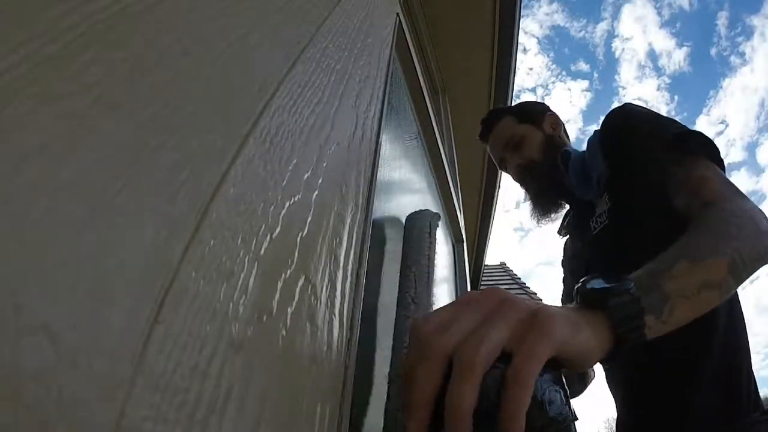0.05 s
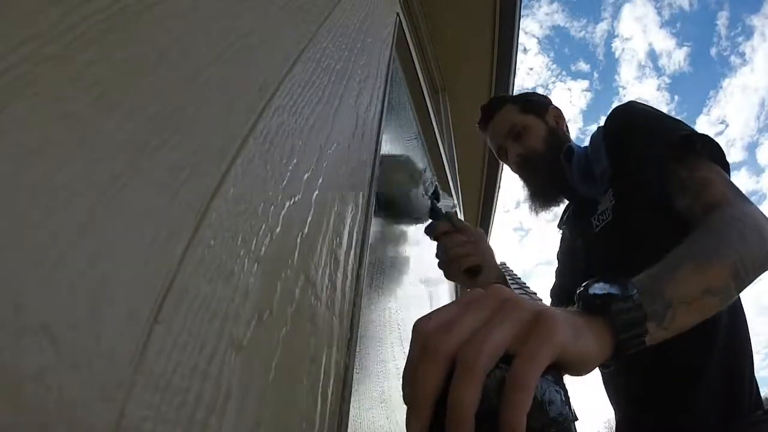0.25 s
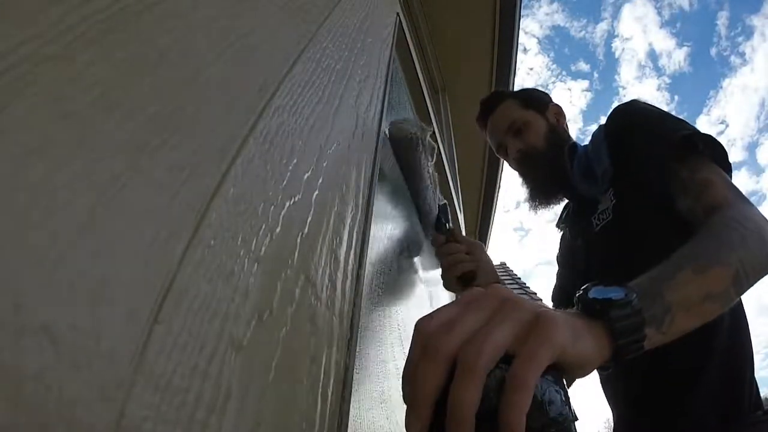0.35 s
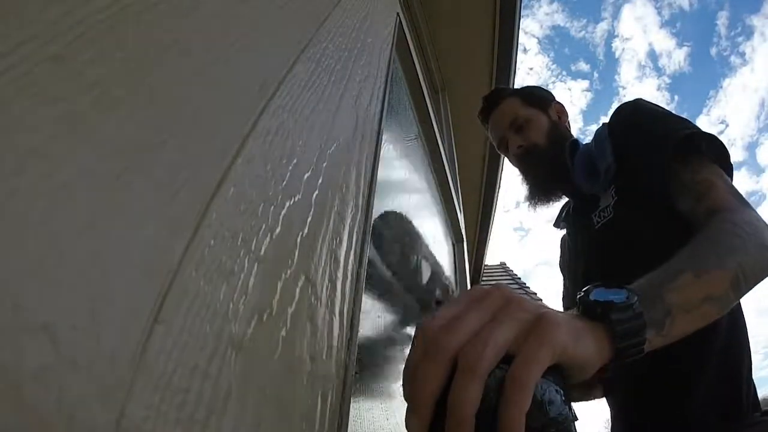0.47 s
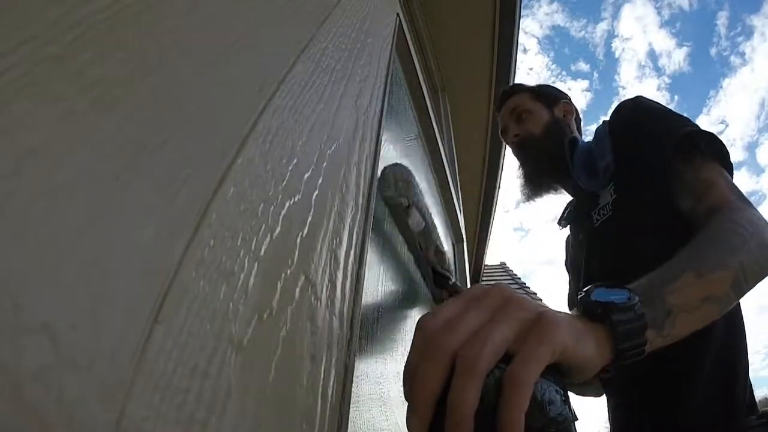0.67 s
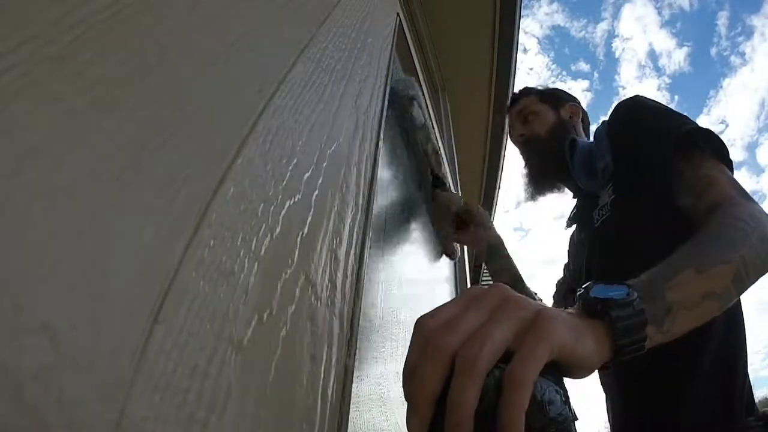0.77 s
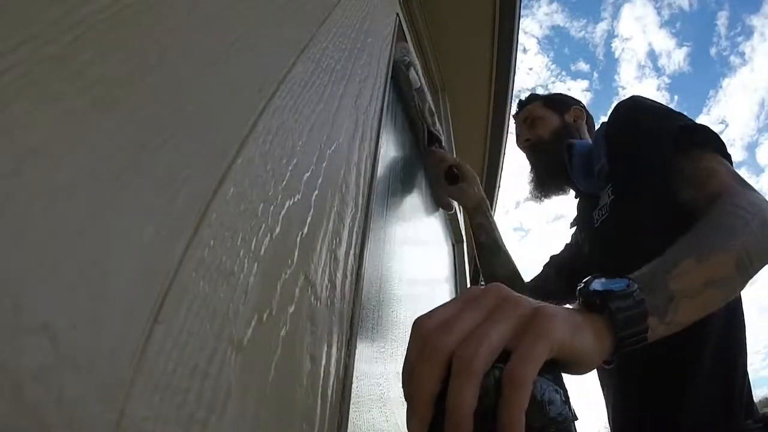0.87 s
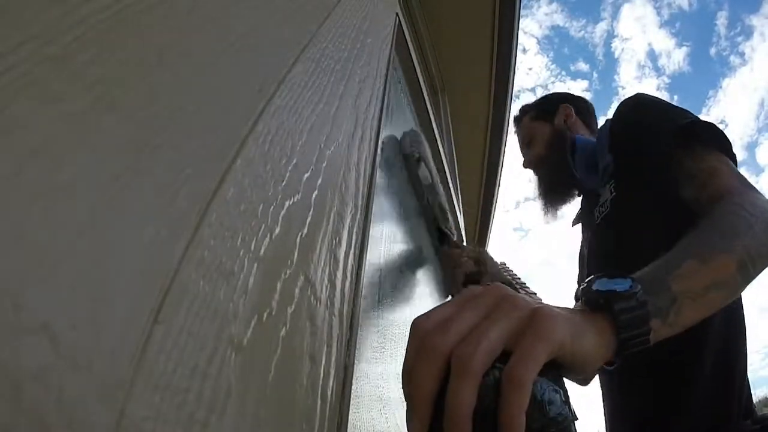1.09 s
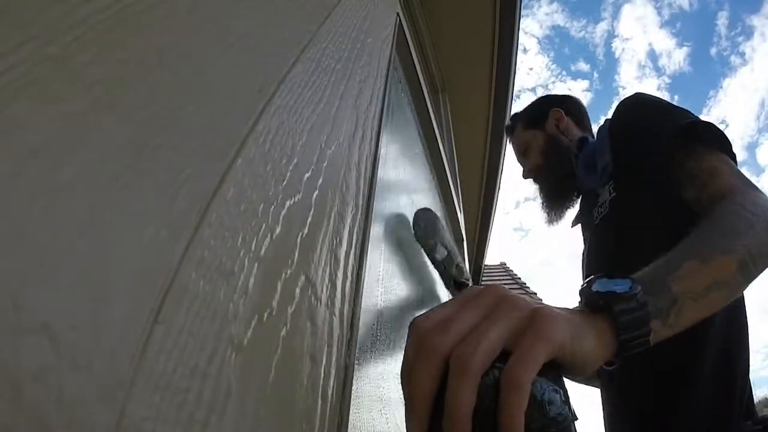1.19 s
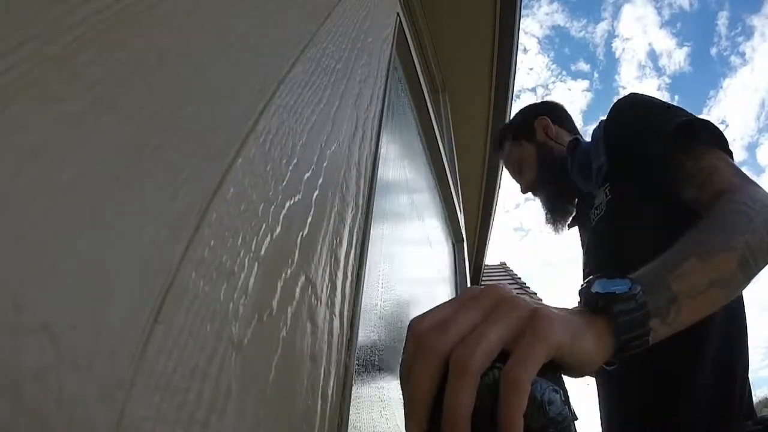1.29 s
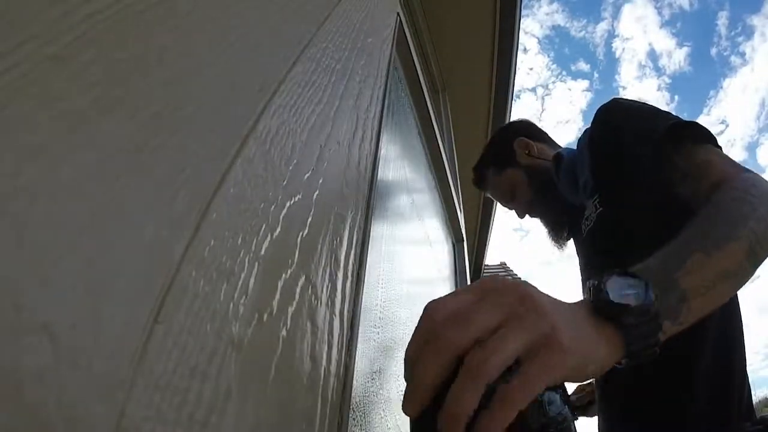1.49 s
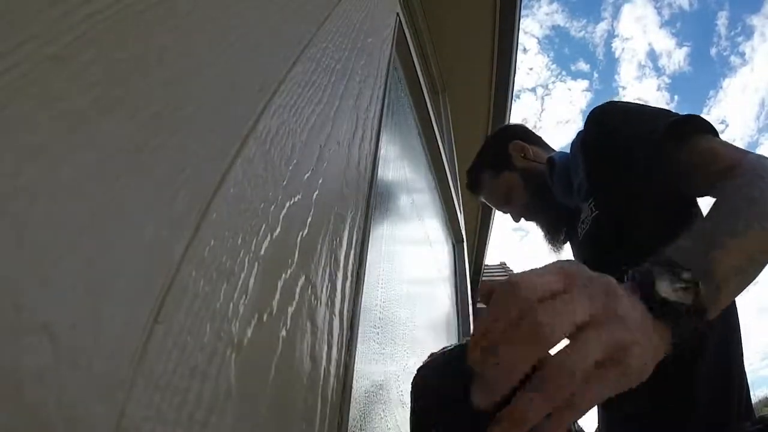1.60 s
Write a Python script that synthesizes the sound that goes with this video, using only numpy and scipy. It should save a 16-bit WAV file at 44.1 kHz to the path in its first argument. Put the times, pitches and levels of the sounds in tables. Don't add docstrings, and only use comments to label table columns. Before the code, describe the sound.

A wet fleece washer rubs window glass in quick strokes, a deep thump booming early; a droplet ticks, a bird chirps faintly, shorter strokes follow, then two knocks ring the bar. Outdoors, microphone close against the wall.

```python
import sys
import numpy as np
from scipy import signal
from scipy.fft import rfft, irfft
from scipy.io import wavfile

SR = 44100
rng = np.random.default_rng(int(sys.argv[2]) if len(sys.argv) > 2 else 0)


def unload_audio(sound):
    columns = np.transpose(np.atleast_2d(sound))
    steps = np.round(np.clip(columns, -1, 1) * 32767)
    wavfile.write(sys.argv[1], SR, steps.astype(np.int16))


def linear_from_db(decibels):
    return 10 ** (np.asarray(decibels, float) / 20)


N = 72765

# frequency_hz, density_db
AIR_SPECTRUM = [(200, -5.5), (300, 0), (500, -4.5), (1000, -6.5), (2200, -10), (3300, -10.5), (5000, -17),
                (14500, -34)]
AIR_DB = -58.5

# start_s, length_s, from_hz, to_hz, level_db
BIRD_NOTES = [
    (.45, .08, 3300, 3550, -68),
    (.525, .07, 2950, 3350, -65),
    (.69, .05, 4050, 3850, -69),
    (.74, .06, 3750, 2800, -60),
]

# start_s, peak_db, contact_cutoff_hz, crack_db, ring_time_share
KNOCKS = [
    (1.3703, -10.5, 3950, -36.5, 0.93),
    (1.447, -28, 9800, -41.5, 0.67),
    (.2485, -32, 2800, -43, 0.43),
    (0.9518, -61, 6019, -53, 0.37),
    (0.995, -51, 6030, -60, .5),
    (1.015, -54, 5000, -66, .5),
    (1.054, -49, 6000, -59, 0.72),
    (1.159, -38.5, 2000, -64, 0.26),
    (1.375, -22.5, 4500, -47, 0.74),
]
# frequency_hz, level_db, t60_s
BAR_MODES = [(521.5, -30, 0.24), (828, -15.5, .07), (993, -9.5, 0.17), (1186, -2.4, 0.088),
             (1409, -1.5, 0.052), (1606, -5, 0.059), (1853, -18, 0.23), (2178, -14, 0.058),
             (2397, -13, 0.048), (2765, -10.5, 0.033), (3200, -24, 0.15), (3512, -11, .03),
             (4110, -13, .03), (4495, -17, 0.035)]
# start_s, level_db, pitch_hz, t60_s
TICKS = [
    (0.433, -29.5, 2550, 0.0033),
    (.518, -50, 4400, 0.035),
    (1.523, -41, 3200, 0.0051),
]
CONTACT_RISE_S, CONTACT_T60_S, RATTLE_DB = 0.0009, 0.048, -29
CRACK_HOLD_S, CRACK_T60_S, CRACK_HZ = 0.0072, 0.05, 1900
HUM_DB, HUM_T60_S, HUM_LOW_HZ, HUM_HIGH_HZ = -10.5, 0.25, 800, 2060

# start_s, length_s, pitch_hz, peak_db
PUSHES = [(.205, 0.14, 124.9, -10.5), (0.316, 0.13, 124, -24.5), (.41, 0.13, 128, -29),
          (1.369, 0.053, 127, -21), (1.40, 0.16, 125, -19), (1.57, 0.093, 100, -31.5),
          (.205, 0.087, 193, -14.5), (.265, 0.067, 201.4, -22.5), (1.371, 0.044, 207, -27.5),
          (1.395, 0.074, 175, -26), (0.212, 0.057, 50, -17), (0.289, .1, 43.6, -23.5),
          (0.386, 0.11, 37, -29.5), (0.916, 0.095, 59, -39), (1.02, 0.18, 42.5, -37.5),
          (1.39, 0.09, 46, -31.5), (1.17, 0.098, 39, -40), (1.498, 0.19, 44, -40), (1.364, 0.036, 321, -36),
          (.5, 0.11, 200, -43.5), (.59, 0.071, 205, -45), (.57, 0.092, 137.6, -43), (0.78, .14, 200, -38),
          (1.19, 0.064, 125, -44), (1, 0.083, 205, -31.5), (0, 0.049, 120, -36), (0.029, 0.069, 210, -36),
          (0.22, 0.069, 220, -62)]
SWELL_SKEW = 0.7
SWAY_DB, SWAY_HZ, SWAY_WIDTH_HZ = -45.5, 38, 15

# start_s, length_s, level_db, rise_s, brightness_db_per_octave
STROKES = [(-.03, .18, -41.5, .12, -0.7), (0.145, 0.062, -41, 0.039, 1.0),
           (0.216, 0.039, -45, 0.0038, -6.5), (0.331, .075, -45.5, 0.018, 0.5),
           (0.786, 0.09, -43.5, 0.015, -0.1), (0.893, 0.045, -46.5, 0.019, -3.5),
           (0.945, 0.052, -42, 0.0027, 0), (1.004, 0.062, -45.5, 0.0088, 1.4),
           (1.09, 0.074, -40.5, 0.048, -1.1), (1.195, 0.056, -57, 0.018, -4.5),
           (1.457, 0.055, -51, 0.0062, -4), (1.524, 0.096, -44.5, 0.019, -2.7)]
TIP_LIFT_DB = [-5.5, -3.0, -.5, 3.5, 3.5, 1.5, 4, 0.5, -4.5, -2, -.4, 1.7]
TIP_HZ, TIP_OCTAVES = 2480, 0.2
# frequency_hz, width_hz, level_db
RUBBED_MODES = [(586, 81, -3.5), (836, 37, -3), (972, 50, 1), (1244, 79, 4.06), (1398, 70, 5.6),
                (1712, 63, 4.9), (1881, 54, -5.5), (2328, 154, -3), (2722, 46, -5), (2928, 49, -8),
                (3360, 146, -5), (3976, 190, -15.5), (4400, 130, -12), (5360, 430, -21.5)]
# frequency_hz, width_hz, share_db
PANE_MODES = [(119.1, 11, 3.5), (160.9, 30.1, 5), (192.9, 16.8, 3), (318, 120, -14)]
RELEASE_S, SAG_DB_PER_S, PLACE_DB = 0.018, 31.5, 1.5
GRAINS_PER_S, GRAIN_SPREAD_DB, JUDDER_DB, JUDDER_PER_S = 2100, 1.5, 1, 96
FIZZ_DB, FIZZ_HZ = -22, 4600
WET_S, DRY_FIZZ_SHARE = 0.52, 0.21
IDLE_SHAKE_DB = -57


def rms_one(x):
    return x / np.sqrt(np.mean(x ** 2) + 1e-20)


def ring(x, hz, t60):
    r = linear_from_db(-60 / (t60 * SR))
    w = 2 * np.pi * hz / SR
    return signal.lfilter([0, np.sin(w)], [1, -2 * r * np.cos(w), r * r], x + 1e-18)


def resonance(x, hz, width_hz):
    r = np.exp(-np.pi * width_hz / SR)
    feedback = [1, -2 * r * np.cos(2 * np.pi * hz / SR), r * r]
    return signal.lfilter([(1 - r * r) / 2, 0, (r * r - 1) / 2], feedback, x)


def cut(x, hz, kind):
    return signal.sosfilt(signal.butter(2, hz, kind, fs=SR, output="sos"), x)


def drift(rate):
    r = np.exp(-2 * np.pi * rate / SR)
    return rms_one(signal.lfilter([1], [1, -2 * r, r * r], rng.standard_normal(N + SR))[SR:])


def air():
    hz = np.arange(N // 2 + 1) * SR / N + 1
    at_hz, density_db = np.transpose(AIR_SPECTRUM)
    weight = linear_from_db(np.interp(np.log(hz), np.log(at_hz), density_db))
    return linear_from_db(AIR_DB) * rms_one(irfft(rfft(rng.standard_normal(N)) * weight, N))


def bird():
    t, waver, out = np.arange(N) / SR, drift(60), np.zeros(N)
    for start, length, from_hz, to_hz, db in BIRD_NOTES:
        x = np.clip((t - start) / length, 0, 1)
        pitch = (from_hz + (to_hz - from_hz) * x) * (1 + 0.0146 * waver)
        level = linear_from_db(db + 2.9 * drift(80)) * np.sqrt(np.sin(np.pi * x) + 1e-12)
        out += level * np.sin(2 * np.pi * np.cumsum(pitch) / SR)
    return out


def droplets():
    ticks = np.zeros(N)
    for start, db, hz, t60 in TICKS:
        click = 1.0 * (np.arange(N) == int(start * SR))
        ticks += linear_from_db(db) * ring(click, hz, t60)
    return cut(cut(ticks, 1500, "high"), 4000, "low")


def knocks():
    t, out = np.arange(N) / SR, np.zeros(N)
    spread = rng.normal(0, 2.0, (len(KNOCKS), len(BAR_MODES)))
    rattle, hiss, hum = rng.standard_normal((3, N))
    hum = cut(cut(cut(hum, HUM_LOW_HZ, "high"), HUM_HIGH_HZ, "low"), HUM_HIGH_HZ, "low")
    hiss = cut(cut(cut(hiss, CRACK_HZ, "high"), 5000, "low"), 5100, "low")
    for (start, db, contact_hz, crack_db, share), spread_db in zip(KNOCKS, spread):
        age = np.maximum(t - start, 0)
        rise = np.minimum(age / CONTACT_RISE_S, 1)
        click = np.arange(N) == int((start + CONTACT_RISE_S / 2) * SR)
        contact = click + rattle * rise * linear_from_db(RATTLE_DB - 60 * age / CONTACT_T60_S)
        contact = cut(cut(contact, contact_hz, "low"), 530, "high")
        for k, (hz, mode_db, t60) in enumerate(BAR_MODES):
            mode_level = linear_from_db(db + mode_db + spread_db[k] - 1.0)
            out += (-1) ** k * mode_level * ring(contact, hz, t60 * share)
        crack = linear_from_db(crack_db - 60 * np.maximum(age - CRACK_HOLD_S, 0) / CRACK_T60_S) * hiss
        frame_hum = linear_from_db(db + HUM_DB - 60 * age / HUM_T60_S / share) * hum
        out += rise * (crack + frame_hum)
    return out


def pane():
    t, out = np.arange(N) / SR, np.zeros(N)
    for start, length, hz, db in PUSHES:
        x = np.clip((t - start) / length, 0, 1)
        swell = np.maximum(np.sin(np.pi * x ** SWELL_SKEW), 0) ** 2.66
        out += linear_from_db(db) * swell * np.sin(2 * np.pi * hz * (t - start))
    noise = rng.standard_normal(N + SR)
    sway = resonance(resonance(noise, SWAY_HZ, SWAY_WIDTH_HZ), SWAY_HZ, 30)[SR:]
    return out + linear_from_db(SWAY_DB) * rms_one(sway)


def stroke_shapes():
    t, shapes = np.arange(N) / SR, []
    for start, length, db, rise, _ in STROKES:
        onset = np.clip((t - start) / rise, 0, 1)
        release = np.exp(-np.maximum(t - start - length, 0) / RELEASE_S)
        sag = linear_from_db(-SAG_DB_PER_S * np.maximum(t - start - rise, 0))
        shapes.append(linear_from_db(db) * onset * release * sag)
    return shapes


def washer():
    t, shapes = np.arange(N) / SR, stroke_shapes()
    sizes = linear_from_db(GRAIN_SPREAD_DB * np.minimum(rng.exponential(1, N), 2.5)) * rng.choice([-1, 1], N)
    grains = rms_one(sizes * (rng.random(N) < GRAINS_PER_S / SR))
    grains = grains * linear_from_db(JUDDER_DB * drift(JUDDER_PER_S))
    tilts = np.array(STROKES)[:, 4]
    place = rng.standard_normal((len(STROKES), len(RUBBED_MODES) + 1))

    def press(hz, k):
        tip = np.array(TIP_LIFT_DB) * np.exp(-(np.log2(hz / TIP_HZ) / TIP_OCTAVES) ** 2)
        return linear_from_db(tilts * np.log2(hz / 1400) + PLACE_DB * place[:, k] + tip) @ shapes

    upper = np.zeros(N)
    for k, (hz, width, db) in enumerate(RUBBED_MODES):
        upper += (-1) ** k * linear_from_db(db + 12.5) * resonance(grains * press(hz, k), hz, width)
    upper = cut(cut(upper, 380, "high"), 380, "high")

    wetness = DRY_FIZZ_SHARE + np.exp(-(t / WET_S) ** 4)
    fizz = grains * press(1400, len(RUBBED_MODES)) * wetness
    fizz = linear_from_db(FIZZ_DB) * cut(cut(fizz, FIZZ_HZ, "high"), 9000, "low")

    shake = rng.standard_normal(N) * (sum(shapes) + linear_from_db(IDLE_SHAKE_DB))
    low = np.zeros(N)
    for hz, width, db in PANE_MODES:
        low += linear_from_db(db + 28) * resonance(resonance(shake, hz, width), hz, 1.81 * width)
    return upper + fizz + cut(cut(low, 288, "low"), 280, "low")


def scene():
    return (air() + bird() + droplets() + knocks() + pane() + washer())[None]


def top_cut(x):
    return signal.sosfilt(signal.butter(12, 14990, fs=SR, output="sos"), x)


def record(dry):
    mix = cut(dry, 36, "high")
    return top_cut(mix)


dry = scene()
out = record(dry)
unload_audio(out)
```